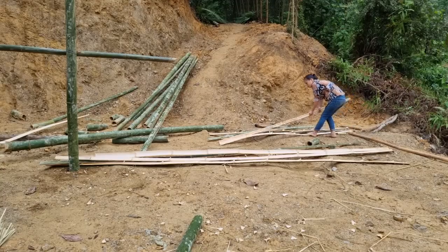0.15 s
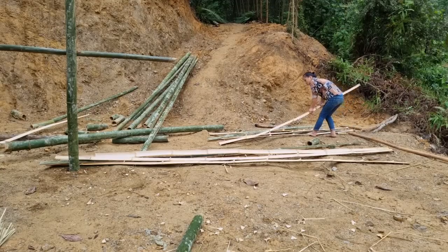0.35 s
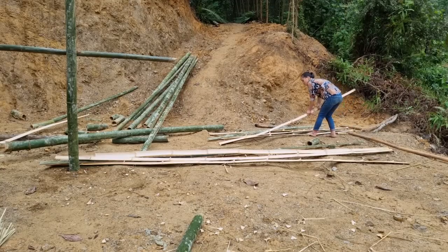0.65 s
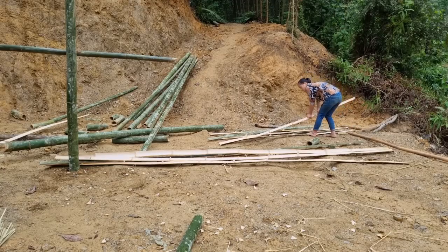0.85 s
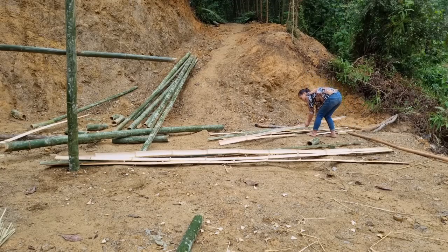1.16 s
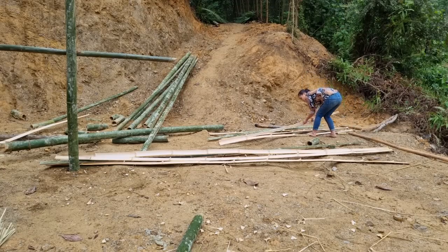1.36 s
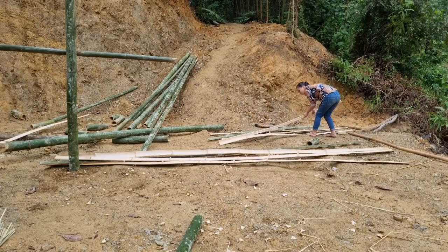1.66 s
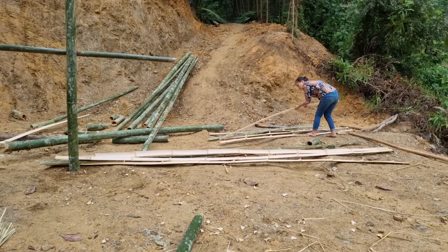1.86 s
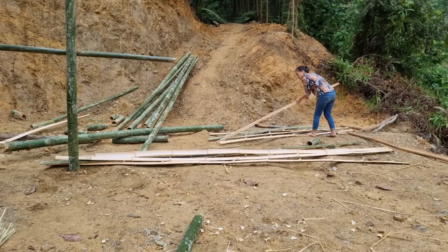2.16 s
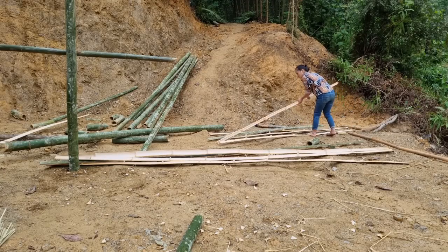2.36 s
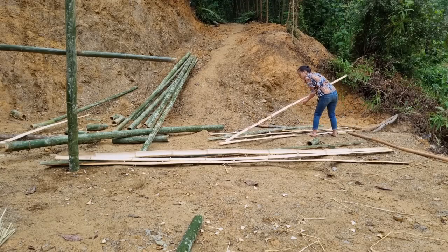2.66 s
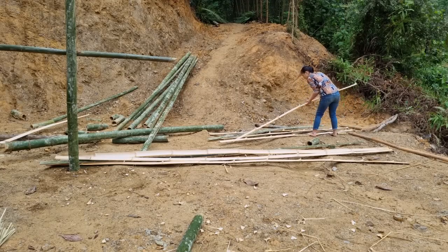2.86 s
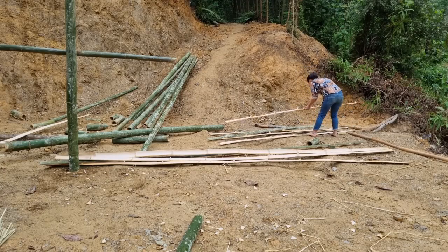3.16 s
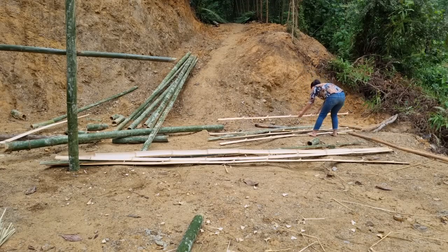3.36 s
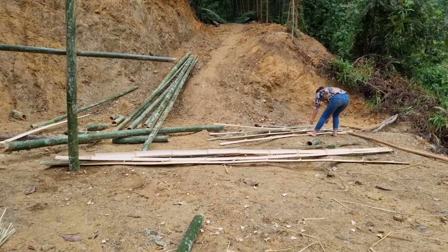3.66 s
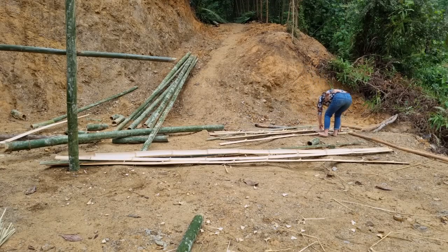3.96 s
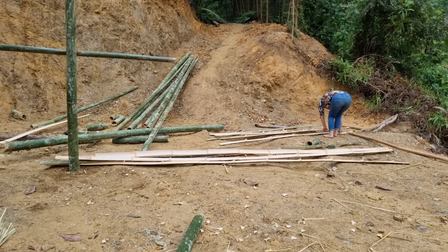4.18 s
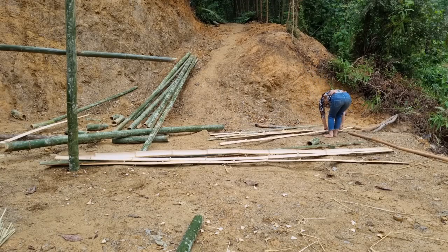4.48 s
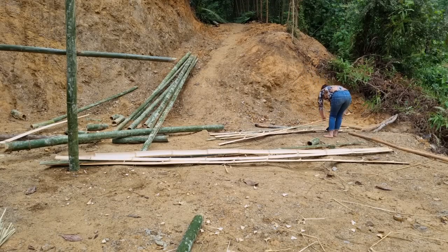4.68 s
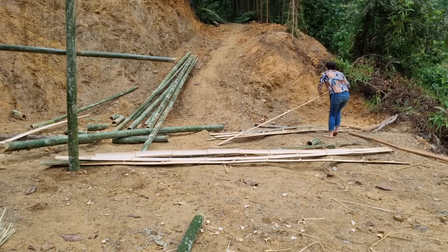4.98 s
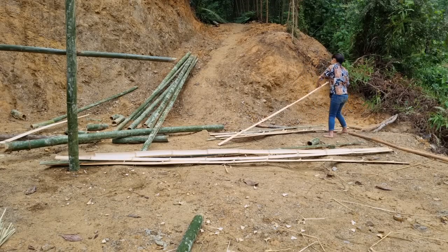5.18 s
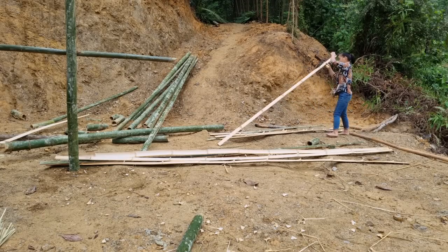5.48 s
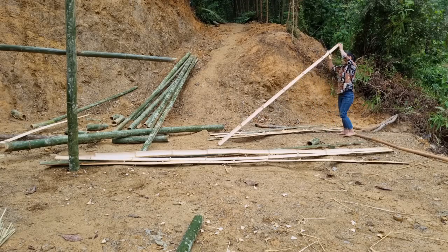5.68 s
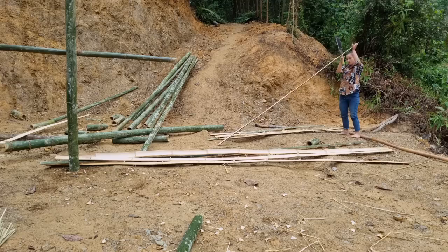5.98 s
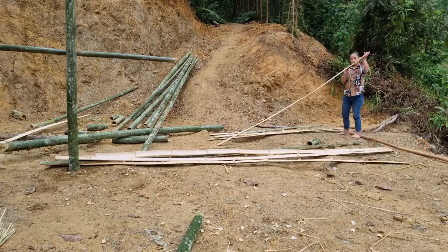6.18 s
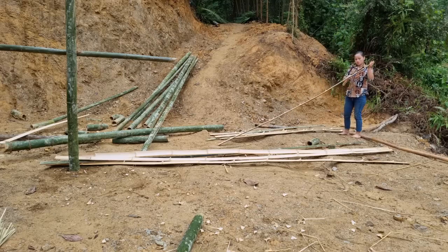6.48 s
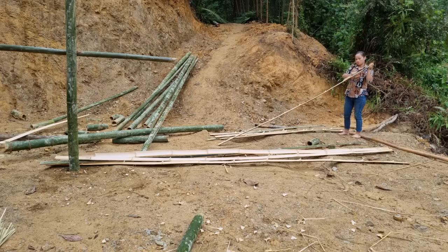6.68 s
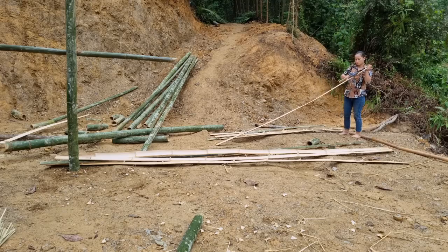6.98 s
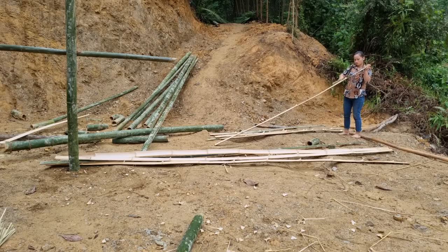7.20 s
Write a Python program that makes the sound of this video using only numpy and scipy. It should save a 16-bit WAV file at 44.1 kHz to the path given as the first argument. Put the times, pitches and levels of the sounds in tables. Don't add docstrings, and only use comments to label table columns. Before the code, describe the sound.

Bamboo slats are handled on bare ground: sharp cracks, brittle ticks, rattles, rubs, dull scuffs and low pole thuds, in separated bursts. Two nearby hens cluck hoarsely and break into cackles, a chick gives short falling peeps about three times a second, and a small bird whistles faint downward slides. The open-air stereo pickup has quiet insect hiss, faint valley rumble and short echoes. It ends with hard cracks and strong cackling.

```python
import sys
import numpy as np
from scipy import signal
from scipy.fft import rfft, irfft, next_fast_len
from scipy.io import wavfile

SR = 44100
rng = np.random.default_rng(int(sys.argv[2]) if len(sys.argv) > 2 else 0)


def boost(x):
    u = np.asarray(x, float) / 20
    return 10 ** u


def digitize_waveform(pressure):
    field = np.atleast_2d(pressure).T
    bounded = np.clip(field, -1, 1)
    quanta = np.round(bounded * 32767).astype(np.int16)
    wavfile.write(sys.argv[1], SR, quanta)


N = 323694
TIME = np.arange(N) / SR


def rms_one(x):
    return x / np.sqrt(np.mean(x ** 2) + 1e-20)


def at_hz(points, hz):
    table = np.array(points)
    return np.interp(np.log(hz), np.log(table[:, 0]), table[:, 1])


def filtered(x, order, hz, kind="low"):
    return signal.sosfilt(signal.butter(order, hz, kind, fs=SR, output="sos"), x)


def drift(rate_hz, count=N):
    run_in = 6000
    r = np.exp(-2 * np.pi * rate_hz / SR)
    white = rng.standard_normal(max(count, 12000) + run_in)
    return rms_one(signal.lfilter([1], [1, -2 * r, r * r], white)[run_in:])[:count]


def add(out, s, piece):
    i = max(round(s * SR), 0)
    out[..., i:i + piece.shape[-1]] += piece[..., :N - i]


def unroll(rows):
    s, *columns = np.transpose(rows)
    t = np.arange(s[0], s[-1], 1 / SR)
    fade = np.clip(np.minimum(t - s[0], s[-1] - t) / 0.0023, 0, 1)
    return [np.interp(t, s, c) for c in columns] + [fade]


def stereo(x, lag_s, pan_db):
    return np.array([np.interp(TIME - lag_s, TIME, x), x]) * boost([[pan_db / 2], [-pan_db / 2]])


# f/Hz, likeness [0-1]
LIKENESS = [(60, 0.56), (300, 0.077), (1000, 0.072), (15000, 0.049)]


def airborne(spectrum, flicker_db):
    size = next_fast_len(N)
    hz = np.arange(size // 2 + 1) * SR / size + 1
    noise = rfft(rng.standard_normal((2, size)))
    mid, side = noise * boost(at_hz(spectrum, hz)) * (hz > 30)
    alike = at_hz(LIKENESS, hz)
    pair = np.sqrt(1 + alike) * mid + np.sqrt(1 - alike) * side * [[1], [-1]]
    octave = np.log2(hz / 16).clip(0).astype(int)
    out = np.zeros((2, N))
    for k in range(1, 11):
        out += irfft(pair * (octave == k), size)[:, :N] * boost(flicker_db * drift(9))
    return rms_one(out)


# f/Hz, level/dB [per Hz]
FOREST = [(1180, -39.5), (2000, -33.5), (2380, -1.5), (2760, -0.5), (3120, -0.5), (3980, -1), (4530, -2),
          (5680, -10), (6760, -15.5), (7840, -7), (9330, -29), (14900, -21.5), (16000, -19)]
# t/s, level/dB
FOREST_DB = [(0.0, -56.5), (0.49, -63.5), (2.41, -66), (2.64, -59), (3.33, -67), (3.78, -58.5),
             (4.93, -66.5), (6.73, -64), (7.34, -56.5)]
# f/Hz, level/dB [per Hz]
VALLEY = [(18, -28), (30, -1.5), (103, -7), (239, -19.5), (275, -18.5), (339, -20.5), (709, -20),
          (939, -19), (2000, -19.5), (2600, -40.5), (4400, -120)]
VALLEY_DB = -77


def forest():
    swell_db = np.interp(TIME, *np.transpose(FOREST_DB)) + 4
    insects = boost(swell_db) * airborne(FOREST + [(20000, -40)], flicker_db=.45)
    valley = boost(VALLEY_DB + 2.5) * airborne(VALLEY, flicker_db=-4.0)
    return insects * boost([[-.8], [.8]]) + valley


# f/Hz, width [Hz], level/dB
CRICKETS = [(2122, 17, -2.5), (2500, 27, -9), (3150, 17, 6), (4097, 130, 0.5), (4460, 40, 3.5),
            (5690, 240, 6.5), (8150, 270, -25)]


def crickets():
    out = np.zeros((2, N))
    for hz, width_hz, level_db in CRICKETS:
        r = np.exp(-np.pi * np.clip(width_hz, 20, 500) / SR)
        poles = [1, -2 * r * np.cos(2 * np.pi * hz / SR), r * r]
        song = signal.lfilter([1, 0, -1], poles, rng.standard_normal((2, N)))
        out += rms_one(song) * boost(level_db - 77 + width_hz / 60 + 1.5 * drift(2))
    return out


def whistle(rows, waver_db):
    hz, level_db, fade = unroll(rows)
    count = len(hz)
    phase = 2 * np.pi * np.cumsum(hz * (1 + 40 / hz * drift(120, count))) / SR
    return boost(level_db + waver_db * drift(60, count)) * fade * np.sin(phase)


# t/s, length [s], from f/Hz, to f/Hz, level/dB
GLIDES = [
    (0, .04, 3350, 2750, -53),
    (2.83, .04, 4150, 3700, -57),
    (1.759, .009, 7850, 7800, -26),
    (1.772, .03, 7800, 7700, -43),
    (1.85, .1, 2330, 2150, -58),
    (1.985, .095, 2950, 2280, -57),
    (2.215, .03, 4350, 4250, -61),
    (2.446, .014, 3300, 3100, -41),
]


def squeals():
    out = np.zeros(N)
    for s, length, hz, end_hz, level_db in GLIDES:
        bend_hz = hz + (end_hz - hz) * .45
        rows = [(0, hz, -4), (length / 3, bend_hz, 0), (length, end_hz, -5)]
        add(out, s, boost(level_db) * whistle(rows, waver_db=1.5))
    return out


def syrinx(hz, voice, upper_db, rough, breath_db, hoarse_db):
    count = len(hz)
    phase = 2 * np.pi * np.cumsum(hz * (1 + 0.053 * rough * drift(60, count))) / SR
    air = rng.standard_normal(count + 1)
    hiss = air[1:] - .5 * air[:-1]
    rasp = filtered(air[1:], 2, [450, 1450], "band")
    breath = boost(breath_db + 1.0 - 0.6 * upper_db) * hiss + boost(hoarse_db) * rough * rasp
    out = breath * (1 + np.cos(phase))
    for k, level_db in voice:
        half_closed = np.minimum(upper_db + 5, 0) * (k > 2)
        loose = np.clip(rough + .05 * max(k - 4.5, 0) - .07 * half_closed, 0, .7)
        shake = 1 - loose + loose * drift(60 if k < 6 else 120, count)
        level = np.sqrt(2) * boost(level_db + upper_db * (k > 2))
        out += level * shake * np.sin(k * phase + rng.uniform(0, 5.13))
    return out


# t/s, length [s], pitch f/Hz, peak level/dB, roughness at peak [0-1]
HIGH_CLUCKS = [
    (.02, 0.13, 479, -53.5, 0.96),
    (.292, 0.084, 471, -51.5, 0.86),
    (.478, 0.098, 477, -51.5, 0.6),
    (2.927, 0.092, 457, -55.5, 0.49),
    (6.662, 0.11, 474.5, -56, 0.95),
    (6.925, 0.076, 490, -54.5, 0.8),
    (7.082, 0.12, 528, -52.5, 1),
]
# harmonic [multiple], level/dB
HIGH_VOICE = [(1, -4), (2, 14), (3, 0), (4, -35), (5, -6), (6, -52), (7, -1), (8, -19)]
# t/s, length [s], pitch f/Hz, peak level/dB, roughness at peak [0-1]
LOW_CLUCKS = [
    (1.108, 0.094, 372.5, -41, 0.46),
    (2.432, 0.086, 369.7, -46.5, 0.2),
    (2.636, 0.13, 369.6, -55.5, 0.67),
    (3.176, 0.099, 420.4, -50.5, 0.64),
    (3.47, 0.22, 418.5, -48, 0.73),
    (4.065, 0.083, 372.6, -40, 0.4),
    (4.48, 0.083, 371.4, -52.5, 0.74),
    (5.482, 0.088, 360, -49.5, 0.79),
    (6.44, 0.14, 271, -67, 0.8),
]
# f/Hz, level/dB
LOW_THROAT = [(280, -8), (750, -5.5), (1100, 6), (1540, -5), (1750, -39), (2600, -21), (3200, -11),
              (5000, -21)]
CLUCK_RISE_SHARE, CLUCK_KNEE_SHARE = 0.33, .55
CLUCK_SCOOP_SHARE, CLUCK_SAG_SHARE = 0.043, 0.051
CLUCK_START_DB, CLUCK_SWELL_DB, CLUCK_KNEE_DB, CLUCK_END_DB = -14, -5, -9.5, -24
CLUCK_EDGE_ROUGH = 0.99


def clucks(calls, gain_db, voice=None):
    out = np.zeros(N)
    for s, length, pitch, db, peak_rough in calls:
        top_s = CLUCK_RISE_SHARE * length
        hz, level_db, rough, fade = unroll([
            (0, pitch * (1 - CLUCK_SCOOP_SHARE), CLUCK_START_DB, CLUCK_EDGE_ROUGH),
            (top_s / 2, pitch, CLUCK_SWELL_DB, peak_rough),
            (top_s, pitch * (1 + CLUCK_SCOOP_SHARE / 2), 0, peak_rough),
            (CLUCK_KNEE_SHARE * length, pitch * (1 - CLUCK_SAG_SHARE), CLUCK_KNEE_DB, CLUCK_EDGE_ROUGH),
            (length, pitch * (1 - 0.73 * CLUCK_SAG_SHARE), CLUCK_END_DB, CLUCK_EDGE_ROUGH)])
        hoarse = np.clip(.85 * rough - .2, 0, 1)
        harmonics = voice or [(k, at_hz(LOW_THROAT, k * pitch)) for k in range(1, 14)]
        note = syrinx(hz, harmonics, 0, hoarse, breath_db=-37.5, hoarse_db=5.0)
        add(out, s, boost(db + level_db + gain_db) * fade * note)
    return out


def modes(hz, centres, widths, gains):
    offset = hz - centres[:, None]
    width = widths[:, None]
    return np.sum(gains[:, None] * width / (width + 2j * offset), axis=0)


# t/s, peak level/dB, body 300-1500 Hz level/dB, top > 8 kHz level/dB, middle 2-3 kHz level/dB
SNAPS = [
    (0.0292, -27, -21, 2, -6.5),
    (3.5285, -9, -37.5, -6, -3.5),
    (6.7955, -17.5, -16, 0, -4),
    (7.1845, -19.5, -22, 3.5, -6),
    (3.8774, -19, -14, -16, 2),
    (2.2222, -50, -60, -6, -30),
    (2.4475, -25, -25, -7, -10),
    (2.013, -51, -50, 11, -20),
]
# t/s, peak level/dB, body level/dB, top level/dB
TICKS = [(1.718, -26, -27.5, 8.5), (1.7072, -42.5, -52.5, 7), (1.7413, -17, -21.5, 11),
         (1.7625, -27.5, -25, -11.5), (6.7915, -26, -4, -4), (0.0435, -38, -8, -17),
         (1.7525, -19.5, -10, 2.5), (1.7695, -37, -18.5, -11.5), (2.4625, -41, 5.5, -21),
         (3.5675, -23.5, -6.5, -17.5), (3.5805, -27.5, -5, -11.5), (3.0883, -53.5, -6, -39),
         (3.5355, -21, -18, -9), (3.5640, -24, -11.5, -3), (3.6200, -37.5, -5, -7),
         (3.8590, -36, -16.5, -26), (3.6096, -37.5, 4, -11), (4.0797, -38, 4, -39.5),
         (4.0997, -44.5, 18, -39), (5.4987, -46.5, 8, -28.5), (5.8173, -48.5, -39, -21)]
# t/s, peak level/dB, body level/dB, top level/dB
CLATTERS = [(1.7289, -22, -17.5, -12), (1.7443, -14, -33, 0.5), (1.7484, -12, -27, 4),
            (1.7893, -39, -28.5, -20.5), (2.6153, -46.5, -13, -10), (3.5315, -23, -15, -22),
            (3.5601, -19.5, -1.5, -9.5), (3.5862, -24, -9.5, -7), (3.6435, -39, 6, -6),
            (3.7379, -40, -5, -7.5), (3.8535, -27, -9.5, -28), (3.8800, -25, -14, -28),
            (3.9294, -36.5, 1.5, -7), (4.6147, -46, -49, 9), (4.5853, -46, -40, 5),
            (7.1865, -22.5, -8.5, 0)]
# t/s, peak level/dB, body level/dB, top level/dB
RUBS = [
    (1.1173, -38.5, -20, -22),
    (2.1164, -44.5, -57, 0),
    (2.42, -41.5, -49, 1),
    (2.757, -37, -11, -30),
    (3.7063, -43, 0, -16),
    (5.0868, -47.5, 2.5, -28),
    (6.765, -48, -12, -10),
    (6.8181, -26, -17, -6),
    (7.2098, -50, -27, -25),
]
# f/Hz, level/dB [per Hz]
SLATS = [(880, -33), (1500, -2), (2230, -1.5), (2970, 2.5), (3220, -1), (4010, -0.5), (6420, -1.5),
         (7690, -1), (9000, -10), (11700, -25), (19800, -120)]


def knocks():
    size = 8192
    out, t = np.zeros((2, N)), np.arange(size) / SR
    hz = np.arange(size // 2 + 1) * SR / size
    end = np.clip((.17 - t) / .04, 0, 1)
    shared = np.clip(1100 / (hz + 1) - .2, .06, .85)
    lean = boost([[-1.5], [1.5]] * np.clip(hz / 9000, 0, 1))
    # contacts, t60 [s], rattle share, first crack [dB] (None: a rub swells instead)
    kinds = (SNAPS, .04, .4, 23), (TICKS, .11, .59, 23), (CLATTERS, .19, .59, 17), (RUBS, .4, .59, None)
    contacts = [(row, *kind) for rows, *kind in kinds for row in rows]
    for (s, peak_db, body_db, top_db, *middle_db), t60, rattle, crack_db in contacts:
        grains = boost(2.0 * np.minimum(rng.exponential(1, (3, size)), 4)) * rng.choice([-1, 1], (3, size))
        grains *= rng.random((3, size)) < 3500 / SR
        grains = rms_one(grains) * (boost(-60 * t / t60) + rattle * boost(-60 * t / 0.11))
        if crack_db is None:
            grains *= np.clip(t / 0.0045, 0, 1)
        else:
            grains[:, 0] += boost(crack_db)
        centres = np.geomspace(260, 15500, 44) * rng.normal(1, .015, 44)
        slope = [(250, body_db - 6), (500, body_db + 6.0), (1000, body_db + 11.0), (1500, body_db / 2 + 9)]
        slope += [(f, db + sum(middle_db) * (f < 3000)) for f, db in SLATS[2:-2]]
        slope += [(10000, top_db - 9.5), (16000, top_db - 13.0)]
        gains = boost(at_hz(slope, centres) + rng.normal(0, 1.96, 44)) * (-1) ** np.arange(44)
        centres[36] = 7800
        gains[36] *= boost(3)
        ring = modes(hz, centres, 140 + 0.084 * centres, gains) * lean
        spectra = rfft(grains)
        pair = np.sqrt(shared) * spectra[0] + np.sqrt(1 - shared) * spectra[1:]
        add(out, s + 0.00073, boost(peak_db - 4.0) * end * irfft(ring * pair))
    return out


# t/s, peak level/dB
PEEPS = [(0.0303, -46), (0.397, -46.5), (0.7138, -41), (1.047, -43), (1.382, -42), (1.535, -45.5),
         (2.0525, -41.5), (2.3844, -44), (2.7174, -56), (3.041, -46.5), (3.376, -43), (4.058, -52),
         (4.4097, -44), (4.735, -42), (5.073, -42.5), (5.425, -42.5), (5.7652, -42), (6.0965, -47),
         (6.2535, -63), (6.431, -46.5), (7.089, -43)]
# t/s [after start], f/Hz, level/dB
PEEP = [(0, 5150, -14), (.004, 5100, -5), (.013, 4800, -4), (.02, 4200, -1), (.026, 3900, -5),
        (.032, 3800, -20)]


def chick():
    out = np.zeros(N)
    for s, level_db in PEEPS:
        shape = np.array(PEEP) * [1, rng.normal(1, .012), 1]
        add(out, s - .003, boost(level_db - 10) * whistle(shape, waver_db=2.8))
    t = TIME[:1500]
    leaf_scatter_t60_s = .035
    leaves = rms_one(rng.standard_normal(len(t)) * boost(-60 * t / leaf_scatter_t60_s)) / np.sqrt(len(t))
    return .6 * out + .7 * signal.fftconvolve(out, leaves)[:N]


# t/s, 2nd harmonic f/Hz, effort level/dB, beak opening level/dB
CACKLE_STARTS = [
    [(0.128, 1188, -54, -8), (0.142, 1153, -37.5, -4.5), (0.156, 1221, -35, -7.5), (0.17, 1244, -47, -3),
     (0.182, 1170, -34.5, -4), (0.194, 1179, -32.5, -4), (0.206, 1173, -36.5, -0.5)],
    [(2.753, 1155, -54, -2), (2.765, 1169, -40.5, -12), (2.777, 1274, -35.5, -6.5),
     (2.785, 1294, -30, -14.5), (2.797, 1161, -38.5, -10.5), (2.817, 1178, -39.5, -5.5),
     (2.825, 1147, -47, 3)],
    [(4.028, 1164, -53, -12), (4.042, 1162, -34.5, -5), (4.092, 1142, -44, 0.5), (4.1, 1152, -35, 1)],
    [(6.765, 1187, -58, 0.5), (6.787, 1169, -41, 1), (6.825, 1163, -49.5, -10), (6.835, 1167, -47, -3)],
    [(7.205, 1118, -53, -3), (7.223, 1180, -36, -1), (7.24, 1177, -31, -4.5)],
]
CACKLE_HOLDS = [
    [(0.21, 1158, -45, -3), (0.218, 1156, -38, -3), (0.282, 1177, -36.5, -3), (0.33, 1196, -50, -3),
     (0.338, 1230, -74, -3)],
    [(2.83, 1136, -47, -3), (2.836, 1145, -40, -3), (2.882, 1136, -41.5, -3), (2.914, 1174, -41.5, -3),
     (2.952, 1186, -49, -3), (2.968, 1216, -51, -3)],
    [(4.105, 1143, -43, -3), (4.119, 1128, -42, -3), (4.127, 1161, -39.5, -3), (4.173, 1171, -39.5, -3),
     (4.197, 1149, -53, -3), (4.219, 1190, -49.5, -3), (4.225, 1190, -70, -3)],
    [(6.84, 1160, -36.5, -3), (6.85, 1162, -37, -3), (6.912, 1169, -38, -3), (6.936, 1207, -40.5, -3),
     (6.956, 1200, -67, -3), (6.962, 1186, -57, -3)],
    [(7.245, 1186, -32.5, -3), (7.319, 1160, -36, -3), (7.338, 1150, -67, -3)],
]
# harmonic [multiple], level/dB
CACKLE_VOICES = [
    [(1, -19.5), (2, 1), (3, -12), (4, -10.5), (5, -24.5), (6, -19), (7, -24), (8, -22), (9, -28),
     (10, -18), (11, -27), (12, -21.5)],
    [(1, -15.5), (2, 2.5), (3, -9.5), (4, -11.5), (5, -13), (6, -14.5), (7, -16.5), (8, -21), (9, -31),
     (10, -20), (11, -21.5), (12, -19.5)],
    [(1, -19), (2, 1.5), (3, -9.5), (4, -8), (5, -11), (6, -25), (7, -22), (8, -22), (9, -32), (10, -30),
     (11, -29), (12, -18)],
    [(1, -22), (2, 1.5), (3, -18.5), (4, -16), (5, -22), (6, -20), (7, -20), (8, -24), (9, -31), (10, -28),
     (11, -27), (12, -21)],
    [(1, -24.5), (2, -1.5), (3, -18.5), (4, -14), (5, -33), (6, -17.5), (7, -25), (8, -24), (9, -30),
     (10, -26), (11, -28), (12, -22)],
]


def cackles():
    out = np.zeros(N)
    for start, hold, voice in zip(CACKLE_STARTS, CACKLE_HOLDS, CACKLE_VOICES):
        hz, level_db, beak_db, fade = unroll(list(start) + list(hold))
        rough = np.clip(.035 - 0.007 * beak_db, .03, .3)
        call = syrinx(hz / 2, voice, beak_db - 3, rough, breath_db=-37.5, hoarse_db=-23.0)
        add(out, start[0][0], boost(level_db - 1.5) * fade * call)
    return out


# t/s, left minus right level/dB
HEN_PAN = [(.3, -3), (1.1, 1), (2.8, 0.5), (4.1, -1), (5.5, 2.5), (6.9, 0), (7.25, -7)]
HEN_LAG_S, BANK_DELAY_S = .00046, .00407
CLUCK_CARRY_DB = -14


def hens():
    loud = boost(9.0) * cackles()
    soft = clucks(LOW_CLUCKS, 5.1) + clucks(HIGH_CLUCKS, 0.96, HIGH_VOICE)
    calls = loud + soft
    late = np.interp(TIME - BANK_DELAY_S + .00008, TIME, calls)
    bounce = filtered(late, 1, 2000)
    pan_db = np.interp(TIME, *np.transpose(HEN_PAN))
    direct = stereo(calls, HEN_LAG_S, 0) * boost([pan_db / 2, -pan_db / 2])
    return direct + boost(-10.0) * bounce, loud + boost(CLUCK_CARRY_DB) * soft


# t/s, peak level/dB, t60 [s]
STEPS = [(0.207, -35.5, 0.21), (1.76, -25.5, 0.3), (1.928, -55, 0.79), (2.114, -35.5, 0.16),
         (3.086, -48, 0.19), (3.601, -31, 0.88), (3.74, -36.5, 1), (3.899, -32.5, 0.82),
         (4.099, -41.5, 0.89), (4.499, -49, 0.39), (4.698, -40.5, 0.32), (4.751, -49, 0.45),
         (5.097, -45.5, 0.2), (6.801, -43, 0.54), (6.868, -52, 0.36), (7.193, -43, 0.7)]


def steps():
    out, t = np.zeros(N), np.arange(12000) / SR
    for s, level_db, t60 in STEPS:
        decay = boost(level_db - 2 - 60 * t / np.clip(t60, .03, .9))
        add(out, s, rng.standard_normal(len(t)) * np.clip(t / 0.01, 0, 1) * decay)
    return filtered(out, 2, [55, 330], "band")


# t/s, peak level/dB, length [s]
SLIDES = [
    (.715, -55, .17),
    (1.19, -54, .125),
    (2.53, -52, .15),
    (2.865, -51, .14),
    (4.245, -54, .15),
    (4.635, -55, .12),
]
# t [share of length], f/Hz, level/dB
SLIDE = [(0, 3500, -5), (.1, 3280, 2), (.22, 2900, -4), (.32, 2500, -3), (.5, 2200, -1), (.9, 2080, -3),
         (1, 2050, -16)]


def sliding_bird():
    out = np.zeros(N)
    for s, level_db, length in SLIDES:
        shape = np.array(SLIDE) * [length, rng.normal(1, .01), 1]
        add(out, s, boost(level_db - 3) * whistle(shape, waver_db=2.2))
    return out


# t/s, length [s], f/Hz, level/dB
WHISTLES = [
    (0.801, 0.13, 4840, -60.5),
    (4.334, 0.021, 1517, -53),
    (4.582, 0.087, 3610, -54),
    (4.722, 0.06, 1678, -67.5),
    (5.807, 0.025, 1592, -55.5),
]


def steady_whistles():
    out = np.zeros(N)
    for s, length, hz, level_db in WHISTLES:
        rows = [(0, hz, -6), (length / 2, hz, 0), (length, .98 * hz, -5)]
        add(out, s, boost(level_db) * whistle(rows, waver_db=2.5))
    return out


# t/s, level/dB
FLEXES = [(1.749, -48.5), (1.755, -39.5), (1.768, -28.5), (1.795, -31.5), (1.868, -54), (1.945, -49),
          (2.123, -52), (2.455, -57), (3.564, -42), (3.593, -43), (3.615, -48), (3.651, -50), (3.714, -47),
          (3.746, -45.5), (3.861, -46), (3.882, -44.5), (3.938, -43.5), (4.088, -56), (4.109, -55.5),
          (6.801, -45), (7.194, -48), (7.218, -51.5)]
# f/Hz, level/dB, t60 [s]
POLE_BENDING = [(79.6, -9, 0.92), (94, 3, 0.37), (158, -1, 0.18), (197, -4, 0.13)]


def thuds():
    out, table = np.zeros(N), np.array(FLEXES)
    at = (table[:, 0] * SR).astype(int)
    for hz, level_db, t60 in POLE_BENDING:
        pushes = np.full(N, 1e-18)
        pushes[at] = boost(table[:, 1] + level_db - 13.0 + rng.normal(0, 2.5, len(at)))
        r, w = boost(-60 / (t60 * SR)), 2 * np.pi * hz / SR
        out += signal.lfilter([0, np.sin(w)], [1, -2 * r * np.cos(w), r * r], pushes)
    return filtered(out, 2, 300) * boost(4.5 * drift(12))


# t/s, level/dB
BLADE_TAPS = [
    (4.5504, -60),
    (4.5853, -51),
    (4.6147, -55),
]
# f/Hz, level/dB, t60 [s]
BLADE = [(4770, -4, 0.049), (5620, -8, 0.11), (7127, -28, 5.0), (7930, -2, 0.23), (10050, -19, 0.24),
         (10720, -33, 2.0), (13000, -13, 0.23), (14880, -18, 0.15)]


def blade():
    out, t = np.zeros(N), TIME[:8000]
    for s, db in BLADE_TAPS:
        for hz, level_db, t60 in BLADE:
            decay = boost(db + level_db + rng.normal(0, 2.5) - 60 * t / np.clip(t60, .02, .4))
            add(out, s, decay * np.sin(2 * np.pi * hz * t))
    return out


BANKS_T60_S, BANKS_CUT_HZ = 0.45, 5000


def banks(x):
    t = np.arange(int(.7 * SR)) / SR
    echoes = rng.standard_normal((2, len(t))) * (t > .012)
    dull = filtered(echoes, 1, BANKS_CUT_HZ)
    tail = dull * boost(-60 * t / BANKS_T60_S)
    tail += 0.078 * dull * boost(-60 * t / 1.8) + 0.13 * echoes * boost(-60 * t / 0.032)
    return signal.fftconvolve(x, tail / np.sqrt(np.sum(tail ** 2) / 2), axes=1)[:, :N]


def scene():
    fowl, carried = hens()
    birds = stereo(squeals() + chick() + steady_whistles(), 0, pan_db=-1.5)
    birds += stereo(sliding_bird(), .00006, pan_db=.5)
    poles = (knocks() + blade()) * boost([[-.2], [.2]])
    ground = stereo(thuds() + steps(), 0, pan_db=3.0)
    slaps = filtered(poles, 1, 1100, "high")
    echo = banks(boost(-24.5) * carried + boost(-15) * slaps + boost(-11) * birds)
    return fowl + birds + poles + ground + echo + forest() + crickets()


def low_pass(x):
    return signal.sosfilt(signal.butter(12, 17010, fs=SR, output="sos"), x)


def record(dry):
    no_rumble = filtered(dry, 4, 44, "high")
    mix = signal.sosfilt(signal.cheby2(10, 60, 17100, fs=SR, output="sos"), no_rumble)
    return low_pass(mix)


dry = scene()
out = record(dry)
digitize_waveform(out)
```